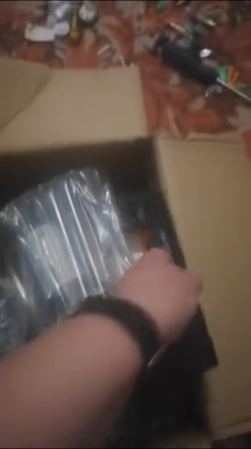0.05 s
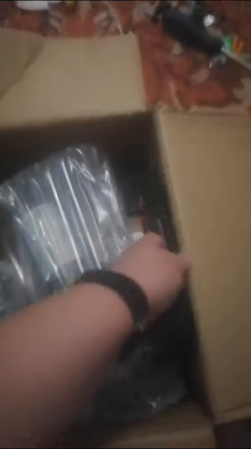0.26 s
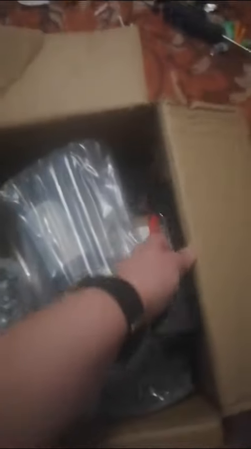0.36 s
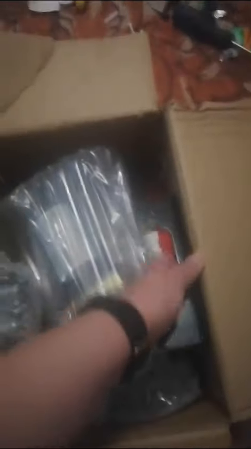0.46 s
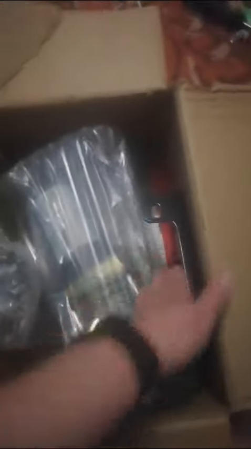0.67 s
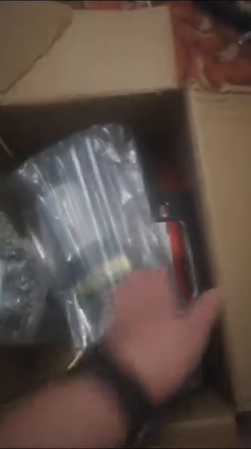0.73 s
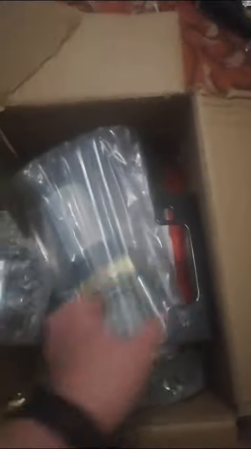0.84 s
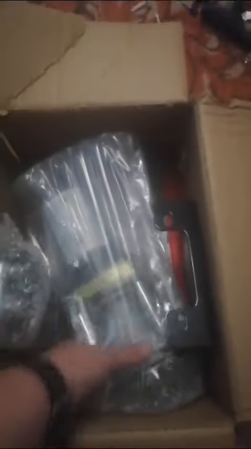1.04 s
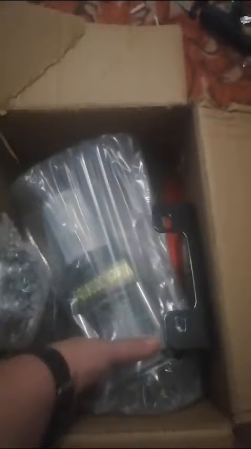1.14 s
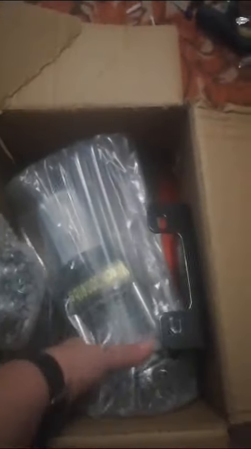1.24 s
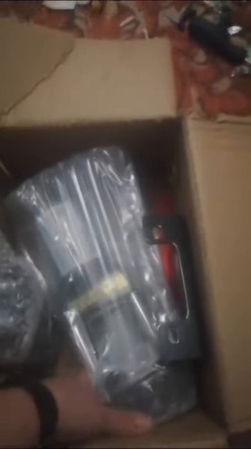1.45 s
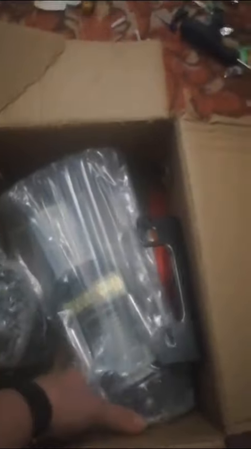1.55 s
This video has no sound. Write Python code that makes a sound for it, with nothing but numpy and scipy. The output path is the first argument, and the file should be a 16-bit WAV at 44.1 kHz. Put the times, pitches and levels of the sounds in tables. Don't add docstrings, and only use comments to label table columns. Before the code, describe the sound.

A hard case thumps about in a cardboard box. A faint hollow hum fades by 0.15 seconds; from 0.23 to 0.75 come uneven low knocks, panel scraping and hard ticks, with a short metallic clink near 0.68. Weaker ticks follow until 1.0. From 1.08 to 1.6, fingers softly pat and drag crisp, snapping plastic film. Close phone stereo, small quiet room, faint hiss.

```python
import sys
import numpy as np
from scipy import signal
from scipy.fft import rfft, irfft
from scipy.io import wavfile

SR = 44100
rng = np.random.default_rng(int(sys.argv[2]) if len(sys.argv) > 2 else 0)


def pcm_store(signal):
    levels = np.round(np.clip(np.atleast_2d(signal), -1, 1) * 32767)
    wavfile.write(sys.argv[1], SR, levels.astype(np.int16).T)


def level_to_linear(level):
    exponent = np.asarray(level, float) / 20
    return 10 ** exponent


N = 70560
CASE_UNTIL_S = 1


def rms_one(x):
    return x / np.sqrt(np.mean(x ** 2) + 1e-20)


def in_time(rows):
    return np.interp(np.arange(N) / SR, *np.transpose(rows))


def colour(x, points, scale=1):
    size = 2 ** 17
    hz, db = np.transpose(points)
    bins_hz = np.arange(size // 2 + 1) * SR / size
    gain_db = scale * np.interp(np.log(bins_hz + 1), np.log(hz), db)
    cepstrum = irfft(gain_db * np.log(10) / 20)
    cepstrum[1:size // 2] *= 2
    cepstrum[size // 2 + 1:] = 0
    return irfft(rfft(x, size) * np.exp(rfft(cepstrum)))[..., :N]


def closed(points):
    (low, low_db), (high, high_db) = points[0], points[-1]
    return [(low / 2, low_db - 30), *points, (high * 1.4, high_db - 30)]


def drift(rate_hz):
    r = np.exp(-2 * np.pi * rate_hz / SR)
    wander = signal.lfilter([1], [1, -2 * r, r * r], rng.standard_normal(N + SR))
    return rms_one(wander[SR:])


def ring(clicks, hz, t60):
    r = level_to_linear(-60 / (max(t60, .005) * SR))
    w = 2 * np.pi * hz / SR
    return signal.lfilter([0, np.sin(w)], [1, -2 * r * np.cos(w), r * r], clicks + 1e-18)


def grains(rate, spread_db, clump_db):
    sizes = level_to_linear(spread_db * np.minimum(rng.exponential(1, N), 4)) * rng.choice([-1, 1], N)
    happens = rng.random(N) < rate * level_to_linear(clump_db * drift(40)) / SR
    return rms_one(sizes * happens)


def tail(t60, length):
    h = rng.standard_normal(length) * level_to_linear(-60 * np.arange(length) / SR / t60)
    return h / np.sqrt(np.sum(h ** 2))


# frequency in Hz, level in dB per Hz.
HUSH_TONE = [(60, -1), (260, -15), (500, -12.5), (2400, -25.5), (3100, -12), (3750, -22), (4600, -13),
             (9000, -28.5)]


def hush():
    mid, side = colour(rng.standard_normal((2, N)), HUSH_TONE)
    gain = level_to_linear(-67) / np.std(mid)
    return gain * mid, gain * side


# frequency in Hz, level in dB.
HUM_MODES = [(252, -58.5), (263, -54.5)]


def hum():
    end_s, fade_s, beat_peak_s = 0.137, 0.014, .076
    t = np.arange(N) / SR
    fade = 1 / (1 + np.exp(np.clip((t - end_s) / fade_s * 2, -50, 50)))
    return fade * sum(level_to_linear(db) * np.cos(2 * np.pi * hz * (t - beat_peak_s)) for hz, db in HUM_MODES)


# time in seconds, level in dB.
DRAG_LEVEL = [(0, -89.5), (.22, -62.5), (.32, -50), (.45, -42), (.57, -49), (.64, -40), (.76, -46.5),
              (.84, -55.5), (.92, -48.5), (1.0, -67.5), (1.07, -58.5), (1.13, -58), (1.21, -45),
              (1.36, -56.5), (1.4, -42.5), (1.45, -55), (1.52, -49), (1.6, -57)]
# frequency in Hz, level in dB per Hz.
DRAG_TONE = [(53, -39), (90, -7.5), (156, 0.5), (376, 1), (1370, -20.5), (1800, -16), (2340, -43),
             (3960, -120)]
# frequency in Hz, gain in dB.
FINGER_DRAG = [(100, -11), (250, -2.5), (600, 2)]


def drag():
    bumps = grains(500, 3.05, clump_db=4.5)
    rub = rms_one(colour(bumps, closed(DRAG_TONE)))
    under_case = np.arange(N) < CASE_UNTIL_S * SR
    rub = np.where(under_case, rub, colour(rub, FINGER_DRAG))
    return level_to_linear(in_time(DRAG_LEVEL) - 1) * rub


# time in seconds, level in dB.
RUSTLE_LEVEL = [(0, -81), (.28, -69.5), (.41, -49), (.53, -59.5), (.6, -62), (.675, -44), (.78, -64.5),
                (.93, -57.5), (.96, -81), (1.07, -71), (1.17, -55.5), (1.3, -53.5), (1.36, -64.5),
                (1.39, -51.5), (1.44, -60.5), (1.48, -51.5), (1.54, -55.5), (1.6, -65.5)]
# frequency in Hz, level in dB per Hz.
FILM_TONE = [(530, -21.5), (900, -5.5), (1790, -19), (2220, -5.5), (3260, -13), (4010, -14), (4980, -9.5),
             (14500, -17.5), (16000, -29)]
# frequency in Hz, gain in dB.
HARD_DULLING = [(8500, -9), (12000, -20.5)]


def rustle():
    smooth_share = 0.46
    buckles = grains(1200, 3.5, clump_db=4.5)
    hiss = rng.standard_normal(N) * level_to_linear(2 * drift(90))
    raw = np.sqrt(1 - smooth_share) * buckles + np.sqrt(smooth_share) * hiss
    film = rms_one(colour(raw, closed(FILM_TONE)))
    under_case = np.arange(N) < CASE_UNTIL_S * SR
    film = np.where(under_case, colour(film, HARD_DULLING, 0.25), film)
    return level_to_linear(in_time(RUSTLE_LEVEL) + 3) * film


# frequency in Hz, level in dB.
SHUDDER_TONE = [(120, -3), (330, -3.5), (800, -6), (2500, -24.5)]


def blows(rows):
    shudder_db, shudder_t60_s = 4, 0.063
    damping_db = 2.5
    panels, shudder = np.zeros(N + SR), np.zeros(N + SR)
    length = SR // 2
    for s, db, hz, t60 in rows:
        r = np.exp(-2 * np.pi * 3.8 * hz / SR)
        push = -signal.lfilter([(1 - r) ** 2], [1, -2 * r, r * r], np.eye(1, length)[0])
        i = int(s * SR)
        panels[i:i + length] += level_to_linear(db) * ring(push, hz, t60)
        deadness_db = -damping_db * np.log2(max(t60, .01) / 0.077)
        shudder[i:i + length] += level_to_linear(db + shudder_db + deadness_db) * tail(shudder_t60_s, length)
    both = panels[:N] + level_to_linear(19.5) * colour(shudder[:N], closed(SHUDDER_TONE))
    return signal.sosfilt(signal.butter(2, 112.5, "high", fs=SR, output="sos"), both)


# start in seconds, level in dB, panel pitch in Hz, t60 in seconds.
THUMPS = [(.2285, -18, 190.7, 0.2), (.229, -34, 801, .04), (.3085, -29.5, 636, 0.024),
          (.2785, -32, 230, 0.037), (.2855, -29, 200, 0.27), (0.3079, -14, 152, 0.13),
          (0.31, -21.5, 202, 0.12), (.3085, -17, 300, 0.03), (.356, -27, 172, 0.098),
          (.425, -33, 283, 0.056), (.4873, -19, 193, 0.18), (.4875, -17.5, 285.4, .03),
          (.6012, -15, 150, 0.07), (.608, -26, 763, .03), (.447, -31, 523, 0.02), (.462, -35, 403, .04),
          (.5795, -31, 452, .025), (.541, -38, 780, 0.018), (0.6085, -18, 252, 0.11),
          (0.6014, -13, 413, 0.013), (.6014, -20.5, 618, 0.028), (.652, -27.5, 236, 0.058),
          (.6838, -14, 420, 0.013), (.6865, -22, 630, 0.021), (.7245, -25, 526, 0.052),
          (.733, -29.5, 600, 0.029), (0.706, -35.5, 62, 0.65), (0.64, -43, 580, .015),
          (0.76, -46.5, 360, 0.028), (.807, -38.5, 267, 0.066), (0.84, -40.5, 377, 0.054),
          (0.97, -37, 374, 0.019)]


def thumps():
    return blows(THUMPS)


# frequency in Hz, level in dB per Hz.
DULL_TONE = [(900, -6.5), (1600, -10), (2350, -2.5), (3200, -12.5), (3800, -18)]


def burst_bodies():
    split_hz = 3820
    click = np.eye(1, 512)
    dull = colour(click, closed(DULL_TONE))[:, :512]
    bright = colour(click, closed(FILM_TONE))
    bright = colour(bright, [(split_hz * .85, -30), (split_hz * 1.1, 0)])[:, :512]
    return dull, bright


def burst(noise, db, brightness_db, dull, bright, length_s):
    t = np.arange(2048) / SR
    shape = np.minimum(t / .0007, 1) * np.exp(-(t / length_s) ** 2)
    share = np.clip(level_to_linear(2 * brightness_db), .003, .97)
    out = np.zeros((2, 2048))
    parts = ((dull, np.sqrt(1 - share)), (bright, np.sqrt(share) * level_to_linear(2)))
    for raw, (body, gain) in zip(noise, parts):
        part = signal.fftconvolve(shape * raw, body, axes=1)[:, :2048]
        out += level_to_linear(db - 3.5) * gain * part / abs(part[0]).max()
    return out


# start in seconds, peak in dB, brightness in dB.
TICKS = [(0.229, -33.5, -12), (0.2846, -43.5, -8), (0.3075, -27.5, -5), (0.448, -38, -1), (0.487, -49, -17),
         (0.54, -39, -26), (0.556, -31, -2.5), (0.579, -42, -8), (0.609, -40, -18), (0.889, -43, -13),
         (0.6009, -33, -6), (0.6463, -32.5, -3.5), (0.6688, -26, -1.5), (0.685, -26, -18.5),
         (0.6849, -17, -40), (0.862, -38.5, -22), (0.9069, -38, -6), (0.9196, -41, -24), (0.984, -48, -5)]


def ticks(noises):
    out = np.zeros((2, N + 2048))
    dull, bright = burst_bodies()
    bright = colour(bright, HARD_DULLING)[:, :512]
    for (s, db, brightness_db), noise in zip(TICKS, noises):
        i = int(s * SR)
        out[:, i:i + 2048] += burst(noise, db, brightness_db, dull, bright, length_s=.004)
    return out[:, :N]


CLINK_HZ = [1992, 2435, 3900, 4457, 4540, 5006, 5122, 7171, 7714, 7836, 10400, 12720, 5260]
# level in dB, t60 in seconds.
CLINK_RING = [(-7, 0.24), (13, 0.022), (5.5, 0.038), (-6.5, 0.13), (3, 0.12), (-2, 0.11), (2.5, 0.089),
              (-4.5, 0.16), (0, 0.09), (3.5, 0.093), (-18, 0.16), (-20.5, 0.28), (-8, 0.12)]


def clink():
    start_s, second_contact_s, freed_s = .6845, .004, .014
    out = np.zeros(N)
    for k, (hz, (db, t60)) in enumerate(zip(CLINK_HZ, CLINK_RING)):
        lowest = k == 0
        start = int(start_s * SR) + int(freed_s * SR) * lowest
        hits = np.zeros(N)
        hits[start] = 1
        hits[start + rng.integers(1, int(second_contact_s * SR))] = 0.2
        flutter_db = 3 * drift(35) if lowest else 0
        out += level_to_linear(db + flutter_db) * ring(hits, hz, t60)
    return level_to_linear(-35) * out


# start in seconds, peak in dB, brightness in dB, crease pitch in Hz.
SNAPS = [(1.0805, -46, -15, 5000), (1.0878, -30.5, -5, 4970), (1.1, -45, -3, 7000),
         (1.1073, -34.5, -7, 7500), (1.1094, -28.5, -6.5, 9500), (1.1121, -29.5, -6, 5840),
         (1.1147, -28.5, -4, 8550), (1.1184, -38, -4, 7500), (1.185, -38.5, 3, 8300),
         (1.196, -39, -3, 6500), (1.208, -36, -15, 5000), (1.217, -37.5, 0, 8300), (1.232, -42, 2, 5000),
         (1.2635, -31, 0, 8200), (1.2668, -32, -8, 5000), (1.2745, -37, 2, 8000), (1.2775, -29, 0, 8000),
         (1.286, -47, 2, 7000), (1.291, -34, 1, 8300), (1.2996, -28.5, -17, 7000), (1.3091, -25.5, 7, 5100),
         (1.32, -39, 0, 7500), (1.331, -42, 1, 8500), (1.3404, -32, 2, 6950), (1.345, -40.5, 1, 8450),
         (1.379, -39, 0, 8000), (1.3822, -36, 1, 8200), (1.387, -34.5, 1, 7500), (1.3949, -30, -10, 7000),
         (1.397, -32, 2, 13700), (1.4065, -37, 0, 8000), (1.409, -40, 0, 6000), (1.425, -39, 0, 7540),
         (1.4592, -32.5, 1, 14000), (1.4626, -29, -4.5, 8000), (1.468, -32.5, 1, 14500),
         (1.471, -33.5, -5, 5500), (1.474, -32, 5, 14500), (1.4754, -23, 5, 8100),
         (1.4833, -35.5, -2, 8200), (1.4932, -27, 0, 13000), (1.4951, -30, -1.5, 5000),
         (1.498, -30, -1.5, 5000), (1.5074, -26.5, -2, 14000), (1.521, -39, -16, 5000),
         (1.526, -40, 0, 8000), (1.5297, -39.5, 0, 5950), (1.539, -38, -6, 8500), (1.568, -38, 0, 7200),
         (1.585, -41, 1, 7000)]


def snaps(noises):
    out = np.zeros((2, N + 2048))
    dull, bright = burst_bodies()
    for (s, db, brightness_db, hz), noise in zip(SNAPS, noises):
        crease = bright + level_to_linear(10) * signal.lfilter(*signal.iirpeak(hz, 5.2, SR), bright)
        i = int(s * SR)
        out[:, i:i + 2048] += burst(noise, db, brightness_db, dull, crease, length_s=.002)
    return out[:, :N]


# start in seconds, level in dB, pitch in Hz, t60 in seconds.
PATS = [(1.0888, -27.5, 396, 0.027), (1.1075, -32.5, 322, 0.09), (1.112, -25, 307, 0.031),
        (1.115, -29, 470, .03), (1.127, -44, 530, 0.035), (1.132, -38, 258, 0.033),
        (1.2064, -30.5, 530, 0.02), (1.397, -37.5, 380, 0.028), (1.507, -38.5, 780, 0.043),
        (1.0885, -33.5, 1140, 0.018), (1.0882, -35.5, 3200, 0.013), (1.1125, -34.5, 3050, 0.02),
        (1.535, -47.5, 110, 0.18), (1.519, -45.5, 410, 0.072)]


def pats():
    return blows(PATS)


def scattered(x):
    return np.array([x, signal.fftconvolve(x, tail(.0105, 1024))[:N]])


def room_around(box):
    echoes = [np.r_[np.zeros(300), tail(0.26, SR // 3)] for _ in range(2)]
    room = np.array([signal.fftconvolve(box, echo)[:N] for echo in echoes])
    return level_to_linear(-14) * colour(room, [(150, -3.5), (500, 6.0), (6000, 0), (14000, -51)])


# frequency in Hz, gain in dB.
BOX_NOTCH = [(3700, 0), (4030, -6.5), (4350, 0), (11500, -1.5), (14800, 2)]
# frequency in Hz, gain in dB.
WIDTH = [(200, -22), (400, -10), (700, -1), (1200, 0)]


def scene():
    noises = rng.standard_normal((80, 2, 2, 2048))
    bursts = ticks(noises) + snaps(noises[len(TICKS):])
    sources = (thumps() + pats(), rustle(), drag(), hum())
    spread = sum(scattered(x) for x in sources)
    metal = scattered(clink()) * level_to_linear(np.array([[0], [-5]]))
    box, side = bursts + spread + metal
    box = colour(box, BOX_NOTCH)
    room = room_around(box)
    hush_mid, hush_side = hush()
    side = colour(side + hush_side, WIDTH)
    return box + hush_mid + side * np.array([[1], [-1]]) + room


def roll_off(x):
    return signal.sosfilt(signal.butter(12, 16630, fs=SR, output="sos"), x)


# frequency in Hz, gain in dB.
LEFT_OVER_RIGHT = [(60, -3.3), (250, -4.3), (600, -5), (1300, .5), (2400, -4.5), (4400, -3), (8100, 8),
                   (14000, -3)]


def record(dry):
    left = colour(dry[0], LEFT_OVER_RIGHT, 0.5)
    right = colour(dry[1], LEFT_OVER_RIGHT, -0.77)
    top_cut = signal.cheby2(12, 60, 16700, fs=SR, output="sos")
    mix = signal.sosfilt(top_cut, np.array([left, right]))
    return roll_off(mix)


dry = scene()
out = record(dry)
pcm_store(out)
```